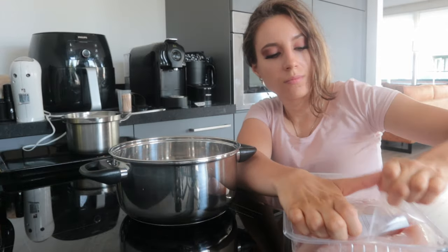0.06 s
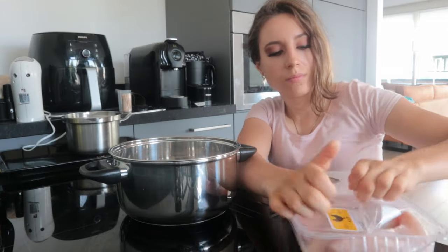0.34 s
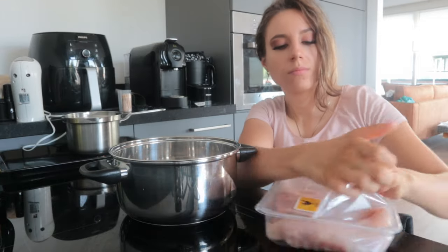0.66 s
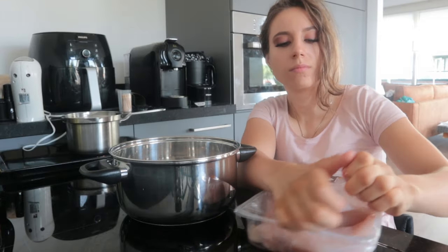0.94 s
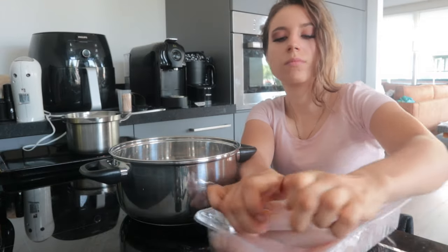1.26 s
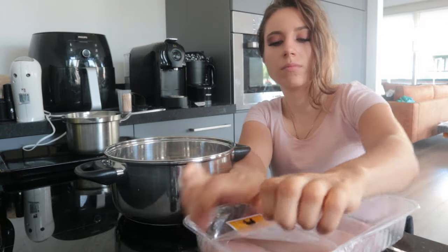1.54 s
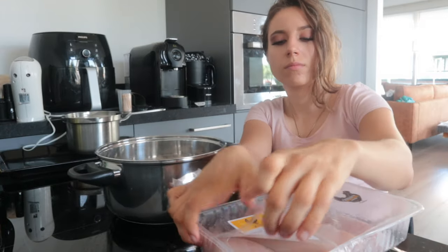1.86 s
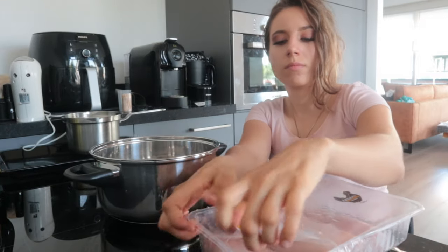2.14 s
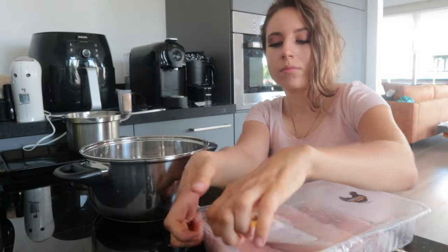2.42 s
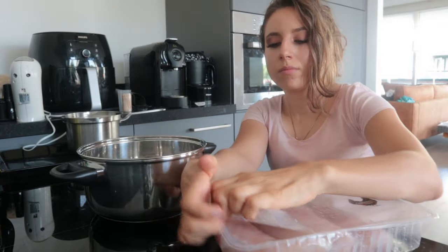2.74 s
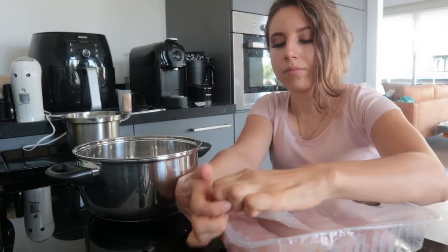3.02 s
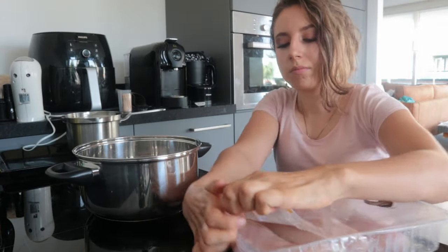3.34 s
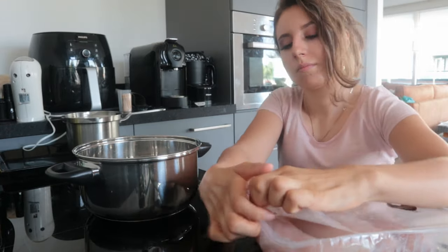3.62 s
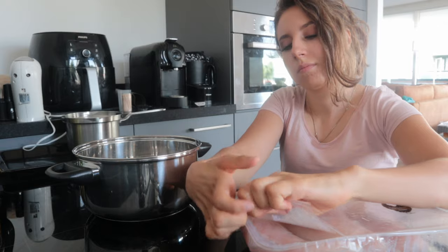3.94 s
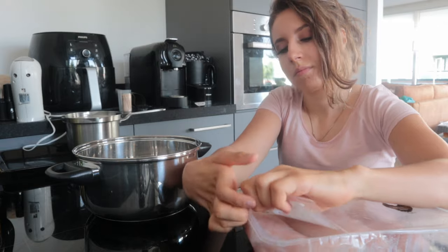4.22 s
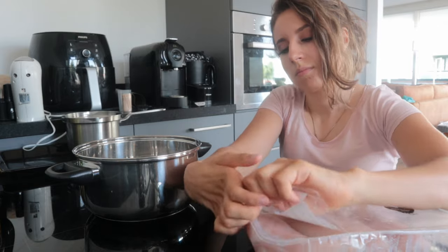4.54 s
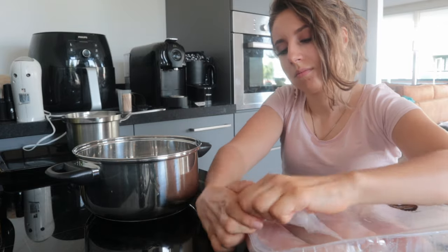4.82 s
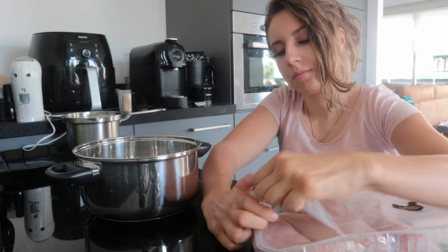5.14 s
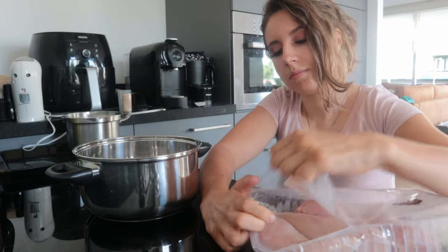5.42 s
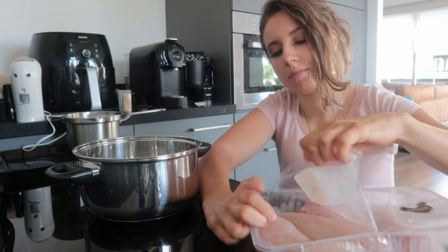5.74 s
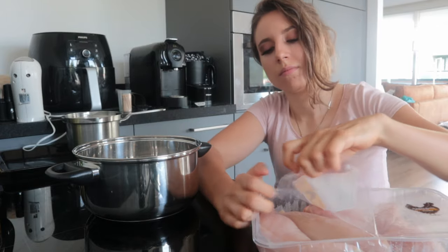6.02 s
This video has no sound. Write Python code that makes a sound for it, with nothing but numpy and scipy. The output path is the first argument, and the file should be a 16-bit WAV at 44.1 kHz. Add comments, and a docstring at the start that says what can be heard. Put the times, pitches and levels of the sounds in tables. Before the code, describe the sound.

Plastic film crackles, squeaks and snaps as fingers pick it off a food tray, which bumps on a kitchen worktop.

```python
"""Plastic film crackles and squeaks close to a stereo microphone: fingers are picking the lid off a food
tray on a kitchen worktop. Tiny slips make the crackle, stick and slip the squeaks, and creases snap in
sharp clicks. The thin tray and a nearby steel pot ring along; the tray buckles, bumps and judders.
At last the seal rips. Hard kitchen walls answer, and an appliance hums low in the background."""
import sys
import numpy as np
from scipy import signal
from scipy.fft import rfft, irfft
from scipy.io import wavfile
from scipy.ndimage import uniform_filter1d

SR = 44100
rng = np.random.default_rng(int(sys.argv[2]) if len(sys.argv) > 2 else 0)


def digitize_waveform(pressure):
    """Quantize a signal to 16-bit integers and store it at the path in sys.argv[1].

    Rows of a 2-D input are taken as channels; values are limited to [-1, 1].
    """
    field = np.atleast_2d(pressure).T
    bounded = np.clip(field, -1, 1)
    quanta = np.round(bounded * 32767).astype(np.int16)
    wavfile.write(sys.argv[1], SR, quanta)


N = 272097
HZ = np.fft.rfftfreq(N, 1 / SR)
TIME = np.arange(N) / SR

# How hard the fingers work the film between strokes. Each row: time in seconds, level in dB.
FINGER_EFFORT = [(0, -58), (0.65, -48), (1.35, -54), (1.6, -66), (1.75, -47.5), (2.1, -54), (2.35, -50),
                 (2.7, -48), (2.88, -52), (3.15, -54), (3.32, -54), (3.8, -55.5), (4.12, -56.5),
                 (4.33, -61.5), (4.6, -57.5), (4.85, -52), (5.35, -49.5), (6.17, -48)]
# Strokes that crumple the film. Each row: start and length in seconds, level and brightness in dB.
FINGER_STROKES = [(0, 0.059, -37, 1), (0.05, 0.088, -39, 3), (0.183, 0.074, -42, 4.5),
                  (0.311, 0.053, -42.5, 5), (0.455, 0.016, -41.5, -16), (0.496, 0.055, -43, -13),
                  (0.78, 0.12, -47.5, 5.5), (1.029, .06, -46, 2), (1.184, 0.046, -50.5, 5),
                  (1.433, 0.043, -48, 5), (1.503, 0.054, -45, 15), (1.648, 0.076, -45, -5),
                  (1.973, 0.014, -46, -13), (2.235, 0.08, -49, 6), (2.828, 0.023, -40, -13),
                  (2.962, 0.014, -38.5, 5), (3.31, 0.056, -48, -23), (3.433, 0.0077, -19.5, 3),
                  (3.553, 0.015, -33, -4), (3.57, 0.084, -46, -13), (3.778, 0.013, -41, -16),
                  (3.929, 0.041, -49.5, 7), (3.985, 0.025, -57, -2), (4.046, 0.036, -45.5, 5),
                  (4.2, 0.047, -55, 5.5), (4.418, 0.036, -47, 6), (4.69, 0.025, -48, -2),
                  (4.768, 0.034, -39, 0), (4.984, 0.0052, -57, -1), (5.179, 0.026, -24, 4),
                  (5.201, 0.029, -30.5, 0), (5.418, 0.13, -39, 2.5), (5.483, 0.04, -34, 6),
                  (5.546, 0.041, -25.5, 1), (5.585, 0.052, -36, 7.5), (5.872, 0.0036, -34.5, 15.5),
                  (5.963, 0.0055, -34, 5), (6.026, 0.053, -45, -20)]
# Colours of the crackle: tray body, film crinkle, film fizz. Each row: frequency in Hz, gain in dB.
BODY_COLOUR = [(120, -24.5), (230, 0), (340, -1.5), (560, 0), (850, -13.5), (1300, -2.5), (3000, -28)]
CRINKLE_COLOUR = [(400, -57), (800, -2.5), (1100, 0), (1500, 1.5), (2100, 0), (3000, -4), (4200, -14.5),
                  (6000, -23.5), (10000, -66)]
FIZZ_COLOUR = [(2000, -52.5), (4000, 8), (5500, 11), (8000, 9), (11000, 9), (12500, 11), (15500, -14)]
# A steady rumble and hiss. Each row: frequency in Hz, gain in dB.
AIR_COLOUR = [(20, -36), (30, -15), (45, 6.5), (60, -3), (80, -3.5), (115, 0.5), (160, 2), (210, -8),
              (400, -17), (1400, -27.5), (2100, -17.5), (5000, -37.5), (11000, -44), (14000, -51)]
# Fingers squeaking and the seal ripping. Each row: start and length in seconds, level in dB,
# slips per second, then the resonance's first pitch, last pitch and width in Hz.
FILM_DRAGS = [(0.004, 0.043, -36.5, 260, 1410, 1300, 400), (0.039, 0.039, -43, 380, 1590, 1530, 600),
              (0.102, 0.034, -36, 640, 886, 1370, 1500), (0.067, 0.029, -44, 580, 800, 900, 700),
              (0.202, 0.025, -36.5, 485, 554, 1340, 800), (0.443, 0.029, -43, 340, 1940, 1230, 600),
              (0.486, 0.086, -51.5, 1130, 4840, 4400, 2600), (1.475, 0.062, -48, 670, 2780, 2930, 1390),
              (1.534, 0.04, -45, 107, 2040, 2730, 590), (1.557, 0.014, -43.5, 460, 576, 476, 397),
              (1.978, 0.042, -37, 457, 586, 456, 428), (2.957, 0.014, -37, 430, 2410, 1880, 1180),
              (3.432, 0.0088, -30, 830, 2250, 1100, 1790), (3.433, 0.019, -29.5, 600, 300, 342, 159),
              (3.49, 0.018, -38, 225, 1390, 1380, 250), (3.557, 0.014, -33, 730, 1710, 1200, 1380),
              (4.056, 0.025, -41.5, 760, 1280, 1680, 1970), (5.167, .029, -32.5, 950, 1890, 1480, 1480),
              (5.201, 0.026, -31.5, 690, 1500, 1870, 1310), (5.514, 0.015, -34, 273, 450, 302, 202),
              (5.545, 0.031, -25.5, 425, 325, 460, 219), (5.57, 0.064, -34.5, 510, 280, 340, 287),
              (5.555, 0.022, -34.5, 1170, 1700, 2100, 2380), (5.636, 0.017, -32, 620, 2200, 2140, 400)]
# Modes of the tray's walls and, at 1462 Hz, of a nearby steel pot.
# Each row: frequency in Hz, level in dB, time to fall 60 dB in seconds.
WALL_AND_POT_MODES = [(763, 25.5, 0.021), (1020, -35, 0.18), (1261, 13.5, 0.087), (1462, 4, 0.12),
                      (1660, -37, 0.031), (2027, 10, 0.12), (2680, -28, 0.046)]
# The kitchen's tail. Each row: frequency in Hz, time to fall 60 dB in seconds.
ROOM_DECAY = [(100, 1), (500, 0.28), (1500, 0.55), (4000, 0.55), (8000, 0.34), (14000, 0.7)]
# Colour of that tail, and of the room's left-right difference. Each row: frequency in Hz, gain in dB.
TAIL_COLOUR = [(100, 4), (400, -4.5), (900, 3), (1500, 0.5), (2200, -4), (3000, -5.5), (5000, 0.5),
               (8000, -1), (11000, -20.5), (15000, -1)]
SIDE_COLOUR = [(100, -30), (300, -33), (600, -12.5), (2500, -11.5), (5000, 2.5), (14000, -9.5)]
# The clearest snaps of creases and seal; slack film clicks broadly, stiff plastic focuses in the middle.
# Each row: start in seconds, level in dB, brightness in dB per octave, focus in dB.
CREASE_SNAPS = [(0.0392, -39, 3, 3), (0.0548, -36.5, 3, 0.5), (0.1092, -38, 0, 0), (0.1277, -41.5, -4, 3.5),
                (0.2049, -38.5, 0, 5), (0.2591, -42, 1.5, 1.5), (0.3093, -38, 2.5, 5), (0.3374, -38, 3, 13),
                (0.4484, -45, -4, 17), (0.4825, -32.5, 4.5, 6.5), (0.5466, -43, -2, 9),
                (0.5825, -42, -7.5, 19), (0.651, -52, -9, 7), (0.722, -43.5, -5, 11), (0.7656, -51, -4, 15),
                (0.8039, -41, 3.5, 6.5), (0.8448, -44.5, 1.5, 1), (0.9714, -44.5, 1.5, 3),
                (1.0072, -40, -3.5, 3.5), (1.0438, -49, 0.5, 2), (1.087, -46.5, -2.5, 0),
                (1.1204, -50.5, -11, 20), (1.2082, -45.5, 4.5, 8), (1.2782, -47.5, 3.5, 4.5),
                (1.3741, -50, 1, 2.5), (1.504, -41.5, 2, 23), (1.685, -41, 1, 19), (1.6978, -40, -0.5, 3.5),
                (1.7562, -37.5, 8, 14.5), (1.7664, -48.5, -7, 7), (1.8207, -45.5, -4, 11),
                (1.8459, -47, 1, 2.5), (1.868, -45.5, -0.5, 2.5), (1.9867, -39, 4, 21), (2.124, -54, -2, 2),
                (2.1975, -32, -8.5, 19), (2.244, -43, -1.5, 0), (2.303, -43.5, -7, 18),
                (2.371, -43, -1.5, 7), (2.418, -65.5, 9, 1), (2.482, -42.5, 0.5, 8), (2.529, -53, 3.5, 7),
                (2.5579, -50, 2.5, -5.5), (2.6165, -44.5, 0, 6.5), (2.6895, -46.5, 7.5, 16),
                (2.7187, -42.5, 8, 12.5), (2.8244, -43.5, 3, 7), (2.8462, -46, -1.5, -0.5),
                (2.9648, -54, 8, 9), (3.0365, -39, 1.5, 8.5), (3.1772, -41, 0, 12), (3.2185, -46.5, -4, 16),
                (3.3019, -44, -1.5, 2), (3.3253, -71.5, 13, -6), (3.4342, -41, -3, 6),
                (3.4398, -25.5, -6, 11), (3.4426, -28, -8, 14), (3.525, -40, 1.5, 6.5),
                (3.5579, -35.5, 1.5, 3.5), (3.577, -38, 0.5, 8), (3.6505, -42.5, -8.5, 17),
                (3.783, -39.5, -1, 9.5), (3.896, -53.5, 8, 11.5), (3.9235, -51, -1.5, 3.5),
                (3.9685, -65, 8, 0), (3.9866, -48.5, -17, 29.5), (4.0685, -53, -1, 0),
                (4.096, -49.5, 4, 10), (4.349, -49.5, -4.5, 13), (4.432, -42, 3.5, 13.5),
                (4.4847, -50, 7, 21), (4.644, -52, -4, 6.5), (4.663, -52, 5.5, 10), (4.6892, -44.5, 2, 8),
                (4.704, -55, 5.5, 1), (4.732, -45.5, 3, 8), (4.745, -37.5, 0.5, 16),
                (4.7866, -41.5, 2.5, 6), (4.8195, -38.5, 8.5, 23), (4.83, -44.5, 0, 0.5),
                (4.942, -37.5, 1.5, 6), (4.9764, -38, 1, 4), (5.1115, -80, 4.5, -13), (5.182, -36, 4, 3),
                (5.1868, -18, -4.5, 19), (5.195, -29, -3.5, 6.5), (5.301, -40.5, -2, 5),
                (5.3834, -41, 5, 10), (5.427, -48, 2.5, 1), (5.456, -39.5, 2.5, 6), (5.4962, -32.5, 1.5, 3),
                (5.5491, -31, 3.5, 10), (5.5744, -25, -4, 24), (5.589, -35, 0, 0), (5.612, -25.5, -1.5, 18),
                (5.6418, -35, 1, 2), (5.742, -49, -1.5, -5), (5.7475, -32, 3, 13), (5.8038, -34.5, 0.5, 9),
                (5.8746, -20.5, -0.5, 14.5), (5.8981, -29, -1, 16), (5.9825, -38, 1, -1),
                (6.0914, -30, 5, 27), (6.112, -66.5, 0, -19)]
# The bands of a snap. Each row: low and high edge in Hz, gain in dB.
CREASE_BANDS = [(252, 1100, 0), (1038, 2020, 0), (2290, 3970, -1.5), (4480, 12500, -2)]
# Dents popping. Each row: start in seconds, level in dB, pitch in Hz, time to fall 60 dB in seconds.
WALL_BUCKLES = [(0.0747, -24.5, 1606, 0.03), (1.7566, -28, 3350, 0.0043), (2.196, -21.5, 1650, 0.0084),
                (2.1975, -22.5, 710, 0.011), (2.8462, -27, 2280, 0.01), (3.1085, -26, 2180, 0.0055),
                (3.4392, -19.5, 722, 0.025), (3.592, -20.5, 525, 0.0057), (3.784, -27, 1604, 0.012),
                (3.896, -29, 2080, 0.0088), (4.9775, -25.5, 1420, 0.023), (5.187, -11.5, 2090, 0.0082),
                (5.8756, -1, 2600, 0.0027), (5.8771, -27, 3580, 0.006), (5.8801, -12.5, 1477, 0.038),
                (5.8982, -16.5, 2860, 0.0049), (5.898, -26, 1970, 0.02), (5.968, -27, 2880, 0.011),
                (5.9696, -14, 1460, 0.0095), (6.0917, -31, 3620, 0.0043)]
# The tray landing. Each row: start in seconds, level in dB, contact in seconds, relative boom in dB.
TRAY_BUMPS = [(0.191, -49, 0.0087, -22), (0.69, -38.5, .058, -3), (1.004, -38.5, .025, -29),
              (1.682, -46.5, 0.0087, -7), (1.817, -39, 0.0048, -13), (1.976, -35.5, 0.0068, -22),
              (1.987, -24.5, 0.018, -35), (2.003, -24, 0.0077, -22), (2.127, -37, 0.025, -11),
              (2.673, -36, 0.017, -20), (2.816, -50, 0.0065, -20), (3.439, -34, .004, -20),
              (3.453, -27.5, 0.0037, 6.5), (3.579, -36, 0.06, -26), (3.629, -38.5, 0.01, -20),
              (4.653, -31.5, 0.019, -18), (4.768, -45, .02, -6), (5.547, -28.5, 0.022, -19),
              (5.976, -47, 0.0085, -24)]
# Low modes of the tray, with a room resonance near 114 Hz that each bump sets ringing; then the
# worktop's boom. Each row: frequency in Hz, level in dB, time to fall 60 dB in seconds.
TRAY_AND_ROOM_MODES = [(88, 4, 0.11), (113.6, 5, 0.7), (154, -6, 0.34), (162, 8.5, 0.073), (232, 2, 0.11),
                       (331.4, 1.5, .2), (440, -10, 0.088), (545, -12, 0.1), (663, -16, .093),
                       (1120, -16, 0.46)]
WORKTOP_MODES = [(47.6, -4, 0.59), (118, 8.5, 0.12)]
# The tray juddering on the worktop. Each row: frequency in Hz, gain in dB.
JUDDER_COLOUR = [(30, -36), (65, -18), (85, -8), (115, -16.5), (150, 2.5), (180, -14.5), (230, -24),
                 (400, -39), (1000, -68), (4000, -95)]
# Direct sound at the microphone's two ports. Each row: frequency in Hz, left-right likeness from 0 to 1.
PORT_LIKENESS = [(100, 1), (700, 0.81), (3000, 0.82), (5000, 0.25), (14000, 0.47)]
# Phase between the ports. Each row: frequency in Hz, lead of the left in radians.
PORT_LEAD = [(20, 0), (650, 0), (1000, .2), (3800, .12), (5000, .9), (6500, 1.9), (8500, 2.5), (16000, 2.7)]
# The microphone's response. Each row: frequency in Hz, gain in dB.
MIC_RESPONSE = [(20, -29), (40, 0), (11000, 0), (12500, -7.5), (14000, -10), (16000, -13)]


def amp(db):
    """Decibels to gain."""
    return 10 ** (np.asarray(db) / 20)


def unit_rms(x):
    """Scales to rms 1."""
    return x / np.sqrt(np.mean(x ** 2) + 1e-20)


def read(points, hz):
    """Reads a table on a log-frequency axis."""
    f, value = np.transpose(points)
    return np.interp(np.log(hz + 1), np.log(f + 1), value)


def add(mix, start, sound):
    """Adds a sound into the mix at a start in seconds."""
    part = mix[..., max(round(start * SR), 0):][..., :sound.shape[-1]]
    part += sound[..., :part.shape[-1]]


def colour(x, points, size=4096):
    """Causal filter with the given spectrum."""
    log_gain = np.log(amp(read(points, abs(np.fft.fftfreq(size, 1 / SR)))))
    taps = np.fft.ifft(np.exp(np.conj(signal.hilbert(log_gain)))).real[:size // 2]
    return signal.oaconvolve(x, taps[None], axes=1)[:, :N]


def ring(modes, t):
    """Struck modes, as dying sines."""
    return sum(amp(db - 60 * t / t60) * np.sin(2 * np.pi * hz * t) for hz, db, t60 in modes)


def stereo_pair(x):
    """Two unrelated channels become a pair that agrees in the bass and less in the treble."""
    a, b = rfft(x)
    likeness = read(PORT_LIKENESS, HZ)
    mid, side = a * np.sqrt((1 + likeness) / 2), b * np.sqrt((1 - likeness) / 2)
    return irfft([mid + side, mid - side], N)


def finger_pressure(follow, bright_share, attack_share=0.17, release_s=0.0041, release_share=0.37):
    """Gain of a crackle layer: effort plus strokes that rise, hold and let go, long ones more slowly."""
    power = amp(follow * np.interp(TIME, *np.transpose(FINGER_EFFORT))) ** 2
    t = np.arange(-SR // 20, SR // 2) / SR
    for start, length, db, brightness in FINGER_STROKES:
        rise = np.minimum(t, 0) / (attack_share * length)
        fall = np.maximum(t - length, 0) / (release_s + release_share * length)
        stroke = amp(follow * db + bright_share * brightness) * np.exp(rise - fall)
        add(power, start + t[0], stroke[start + t >= 0] ** 2)
    return np.sqrt(power)


def film_crackle(slips_per_s=1400, spread_db=4, rub=0.14, grain_s=0.0034):
    """Countless tiny slips over a faint rub of fingers; bright strokes fizz, dull ones sound the tray."""
    sizes = amp(spread_db * np.minimum(rng.exponential(1, N), 4))
    slips = sizes * (rng.random(N) < slips_per_s / SR)
    bursts = signal.lfilter([1], [1, -np.exp(-2 / (grain_s * SR))], slips ** 2)
    power = bursts / (uniform_filter1d(bursts, size=3000) + 1e-6) + rub ** 2
    grains = np.sqrt(abs(power)) * rng.standard_normal((2, N))
    body = unit_rms(colour(grains, BODY_COLOUR)) * finger_pressure(follow=0.77, bright_share=-0.17)
    crinkle = unit_rms(colour(grains, CRINKLE_COLOUR)) * finger_pressure(follow=1, bright_share=0)
    fizz = unit_rms(colour(grains, FIZZ_COLOUR)) * finger_pressure(follow=1.07, bright_share=1)
    return amp(-21) * body + amp(-5) * crinkle + amp(-17) * fizz


def room_tone(hum_hz=49.5, air_db=-53, hum_db=-51, octave_db=-63):
    """Behind the tray: steady rumble and hiss, and the hum of an appliance motor."""
    air = unit_rms(stereo_pair(colour(rng.standard_normal((2, N)), AIR_COLOUR)))
    phase = 2 * np.pi * hum_hz * TIME
    hum = amp(hum_db) * unit_rms(np.sin(phase)) + amp(octave_db) * unit_rms(np.sin(2 * phase))
    return amp(air_db) * air + hum


def resonate(x, hz, width):
    """A moving resonance: shifts the curve hz down to zero, smooths twice, and shifts back."""
    carrier = np.exp(2j * np.pi * np.cumsum(hz) / SR)
    pole = np.exp(-np.pi * width * 1.5 / SR)
    return (carrier * signal.lfilter([(1 - pole) ** 2], [1, -2 * pole, pole ** 2], x / carrier)).real


def squeaks_and_rips(jitter=0.4, uneven_db=4, hiss=0.044, treble_db=-19, taut_hz=2000, gain_db=-1):
    """Uneven stick and slip rings the stretched film, whose resonance glides with its tension."""
    out = np.zeros(N)
    for start, length, db, rate, first_hz, last_hz, width in FILM_DRAGS:
        size = int(length * SR)
        gaps, heights = rng.standard_normal((2, 100))
        at = (np.cumsum(np.exp(jitter * gaps)) / rate * SR).astype(int)
        slips = hiss * rng.standard_normal(SR // 4)[:size]
        slips[at[at < size]] += amp(uneven_db * heights[at < size])
        film = unit_rms(resonate(slips, np.geomspace(first_hz, last_hz, size), width))
        treble = amp(treble_db) * (last_hz / taut_hz) ** 2 * unit_rms(slips)  # taut film spits more
        add(out, start, amp(db + gain_db) * (film + treble) * signal.windows.tukey(size, 0.5))
    return out


def tray_and_pot_ring(film, gain_db=-14):
    """The tray's walls and a nearby steel pot ring along with the film."""
    modes = ring(WALL_AND_POT_MODES, np.arange(SR // 2) / SR)
    response = modes / np.linalg.norm(modes) / 3
    return amp(gain_db) * signal.oaconvolve(film, response[None], axes=1)[:, :N]


def kitchen(x, tail_db=-7, early_db=-10, early_s=0.0048):
    """Quick reflections off the worktop and pots, then a tail in which each band dies at its own speed."""
    taps = rng.standard_normal((2, SR)) * (rng.random((2, SR)) < 4000 / SR)
    t = np.arange(SR) / SR
    hz, frame_s, bands = signal.stft(taps * (t > 0.004), SR, nperseg=256)
    decay = amp(-60 * frame_s / read(ROOM_DECAY, hz)[:, None])
    tail = signal.istft(bands * decay, SR, nperseg=256)[1][:, :SR]
    tail = colour(tail / np.linalg.norm(tail[0]), TAIL_COLOUR)[:, :SR]
    early = np.roll(taps, SR // 2, axis=1) * (t > 0.002) * np.exp(-t / early_s)
    mid, side = amp(tail_db) * tail + amp(early_db) * early / np.linalg.norm(early[0])
    side = colour(side[None], SIDE_COLOUR)[0, :SR]
    return signal.oaconvolve(x, np.array([mid + side, mid - side]), axes=1)[:, :N]


def faint_snaps(count=36, offset_db=-4, spread_db=2, focus_db=10):
    """Small creases go at random, as strong as the effort; rows as in CREASE_SNAPS."""
    starts = (np.arange(count) + rng.random(count)) / count * N / SR
    size, tone = rng.uniform(-1, 1, (2, count))
    levels = np.interp(starts, *np.transpose(FINGER_EFFORT)) + offset_db + spread_db * size
    brightness = 2 + 2 * tone
    return zip(starts, levels, brightness, np.full(count, focus_db))


def crease_snaps(strain_s=0.0014, flutter_s=0.0035, settle_s=0.02, pivot_hz=2040, focus_octaves=1.79,
                 gain_db=-1.5):
    """A crease strains, then flips in one sharp click and flutters to rest."""
    lead, out = 200, np.zeros((2, N))
    t = np.arange(-lead, 2400) / SR
    strain = 0.018 * np.exp(-abs(t) / strain_s)
    flutter = 0.65 * np.exp(-abs(t) / flutter_s) + 0.038 * np.exp(-abs(t) / settle_s)
    filters = [signal.butter(3, (lo, hi), "bandpass", fs=SR, output="sos") for lo, hi, _ in CREASE_BANDS]
    for start, db, brightness, focus in [*faint_snaps(), *CREASE_SNAPS]:
        snap = rng.standard_normal((2, len(t))) * np.where(t < 0, strain, flutter)
        snap[:, lead] += 2  # the click
        for sos, (lo, hi, band_db) in zip(filters, CREASE_BANDS):
            band = signal.sosfilt(sos, snap)
            onset_rms = np.sqrt(np.mean(band[:, lead:lead + 240] ** 2, axis=1, keepdims=True))
            # brightness tilts the snap about the pivot; focus turns down both ends
            octaves = np.log2(np.sqrt(lo * hi) / pivot_hz)
            tone_db = band_db + brightness * octaves - focus * (octaves / focus_octaves) ** 2
            add(out, start + t[0], amp(gain_db + db + tone_db) * band / onset_rms)
    return out


def wall_buckles(rise_s=0.0002, sag=0.014, sag_s=0.0046, gain_db=-1):
    """A dent pops through the tray wall; its pitch sags as the wall relaxes."""
    t, out = np.arange(SR // 10) / SR, np.zeros(N)
    for start, db, hz, t60 in WALL_BUCKLES:
        cycles = np.cumsum(hz * (1 + sag * np.exp(-t / sag_s))) / SR
        swing = np.sin(2 * np.pi * cycles) * (1 - np.exp(-t / rise_s)) * amp(-60 * t / t60)
        add(out, start, amp(db + gain_db) * swing / abs(swing).max())
    return out


def tray_bumps(scuff=0.13, swell_s=0.0029, gain_db=-8):
    """The tray lands and scuffs; it and a room resonance ring, and a hard push booms in the worktop."""
    t, out = np.arange(SR // 2) / SR, np.zeros(N)
    tray_and_room = ring(TRAY_AND_ROOM_MODES, t)
    boom = ring(WORKTOP_MODES, t) * (1 - np.exp(-t / swell_s))
    for start, db, contact_s, boom_db in TRAY_BUMPS:
        contact = np.exp(-t / contact_s) / np.sqrt(contact_s * SR / 100)
        push = scuff * unit_rms(rng.standard_normal(len(t))) * contact
        push[0] += 1  # the landing
        knock = signal.fftconvolve(push, tray_and_room)[:len(t)]
        add(out, start, amp(db + gain_db) * (2 * knock / abs(knock).max() + amp(boom_db) * boom))
    return out


def tray_judder(gain_db=-8, rest_db=-65, lag_s=0.027, rise_db_per_s=300, fall_db_per_s=200):
    """After each bump the heavy tray judders on across the worktop, then sinks to a faint rumble."""
    judder = unit_rms(colour(rng.standard_normal((1, N)), JUDDER_COLOUR)[0])
    slide_db = np.full(N, float(rest_db))
    for start, db, *_ in TRAY_BUMPS:
        t = TIME - start - lag_s
        swell_db = np.minimum(rise_db_per_s * t, -fall_db_per_s * t)
        slide_db = np.maximum(slide_db, db + gain_db + swell_db)
    return judder * amp(slide_db)


def scene(sway_hz=1.3):
    """Film and tray up close, the kitchen behind; the hands move, so the room's paths keep changing."""
    plastic = stereo_pair(crease_snaps() + film_crackle()) + squeaks_and_rips() + wall_buckles()
    direct = plastic + tray_and_pot_ring(plastic)
    sway = 2 * np.pi * sway_hz * TIME
    reflections = kitchen(direct * np.cos(sway)) + kitchen(direct * np.sin(sway))
    return direct + reflections + tray_bumps() + tray_judder() + room_tone()


def record(dry, left_db=-0.55, above_hz=700, edge_hz=15800):
    """A close, band-limited microphone; in the treble its left port leads and its right is a bit louder."""
    left = np.exp(1j * read(PORT_LEAD, HZ) / 2) * amp(left_db * (HZ > above_hz))
    ports = irfft(rfft(dry) * np.array([left, 1 / left]) * amp(read(MIC_RESPONSE, HZ)), N)
    lowpass = signal.firwin(255, edge_hz, window=("kaiser", 9), fs=SR)
    return signal.oaconvolve(ports, lowpass[None], "same")


dry = scene()
out = record(dry)
digitize_waveform(out)
```